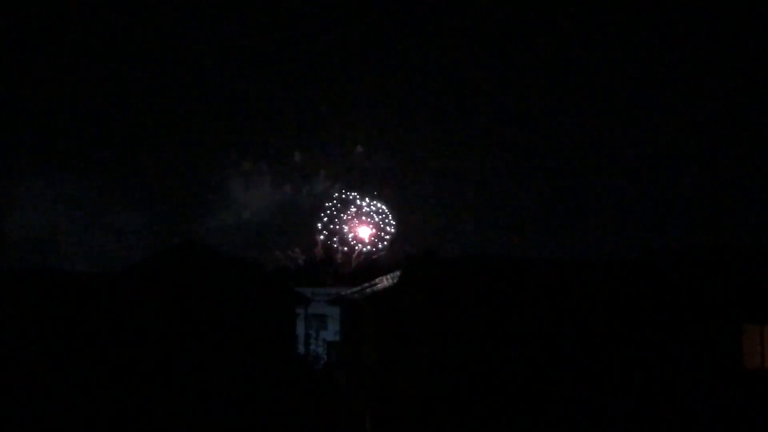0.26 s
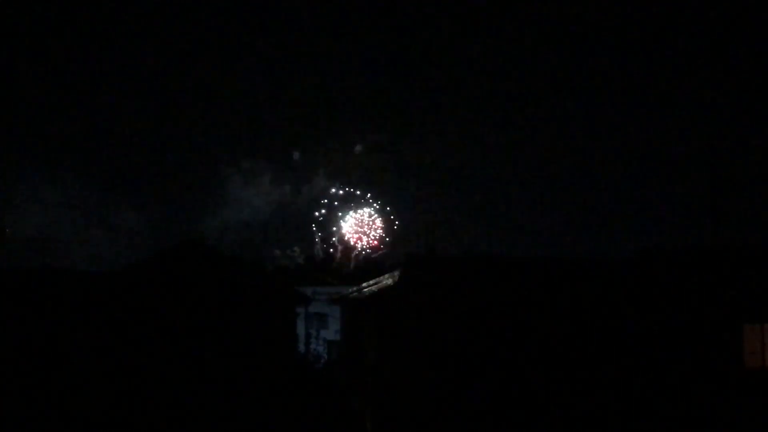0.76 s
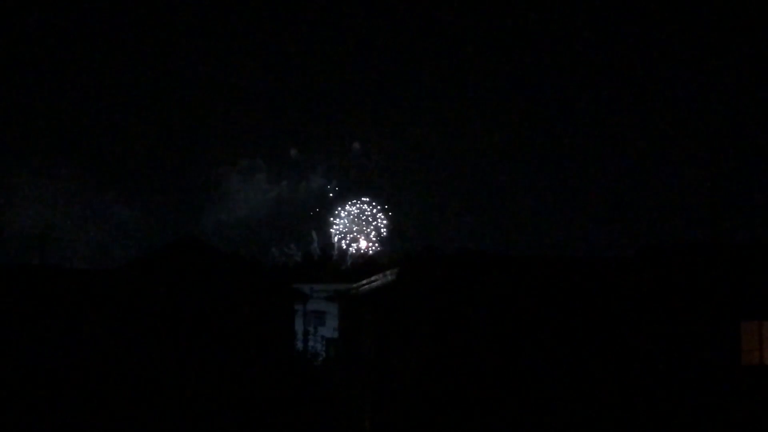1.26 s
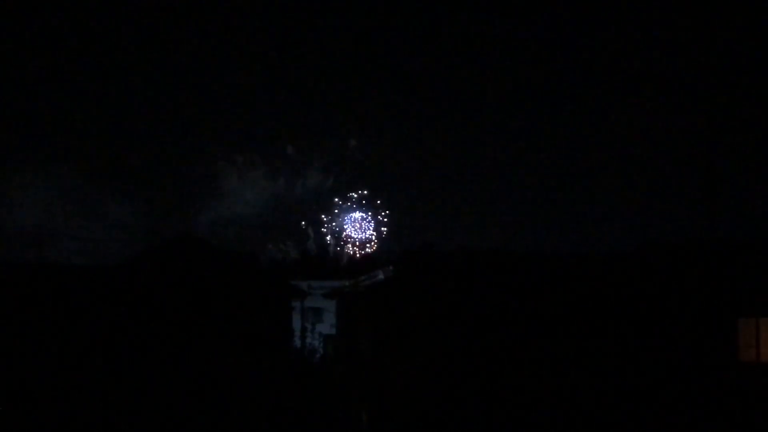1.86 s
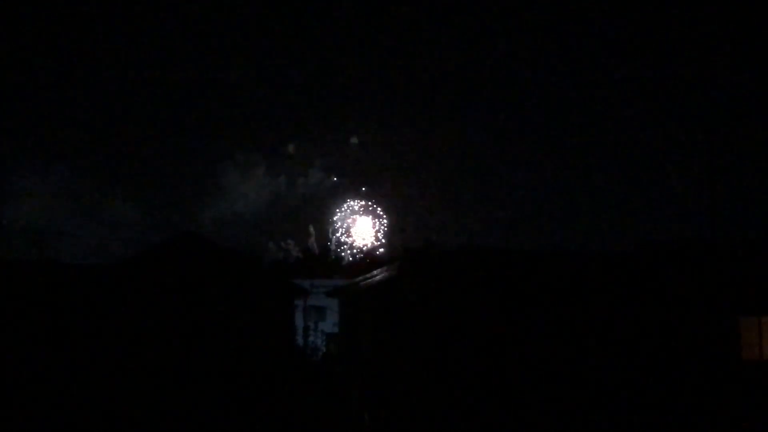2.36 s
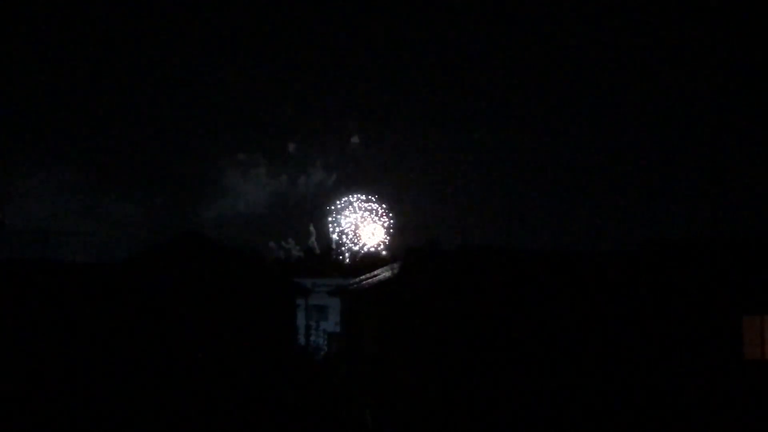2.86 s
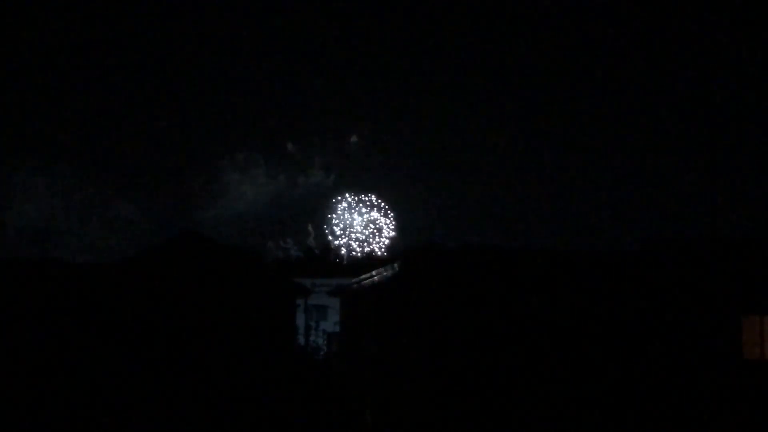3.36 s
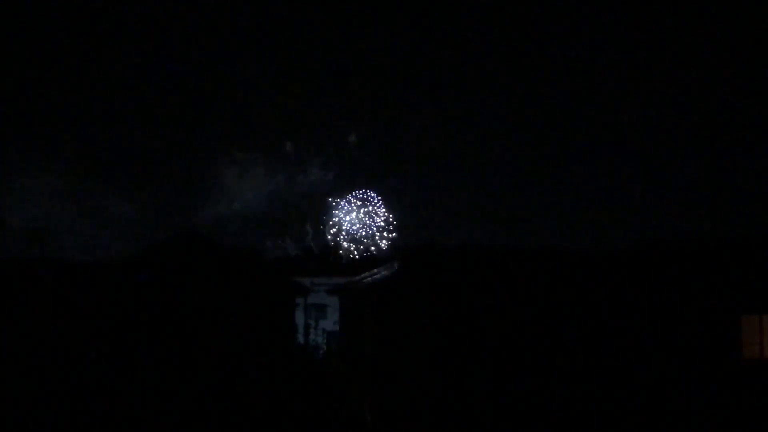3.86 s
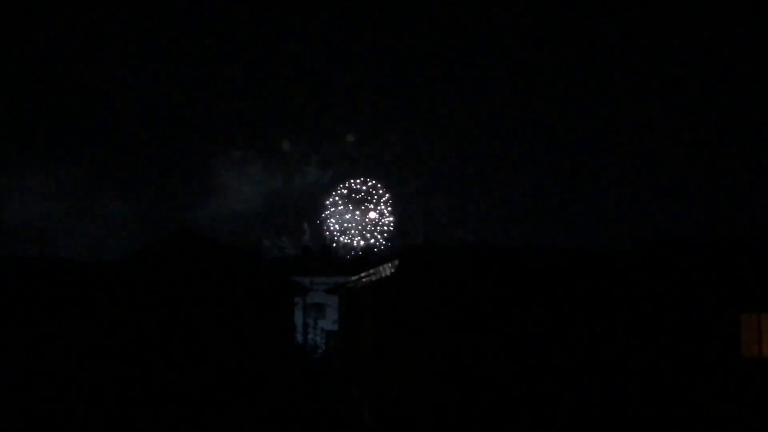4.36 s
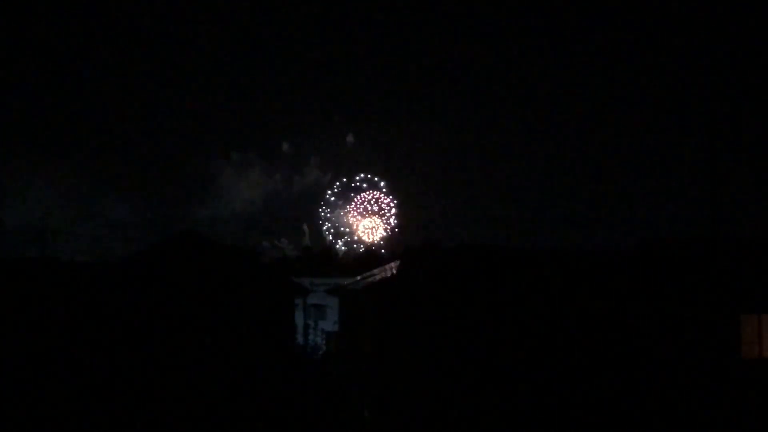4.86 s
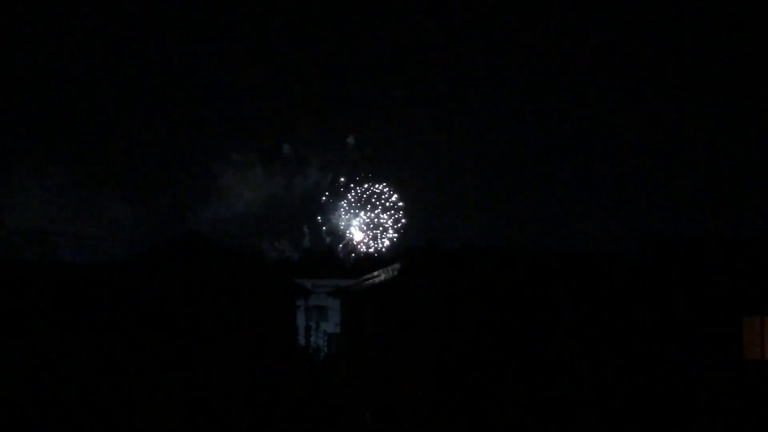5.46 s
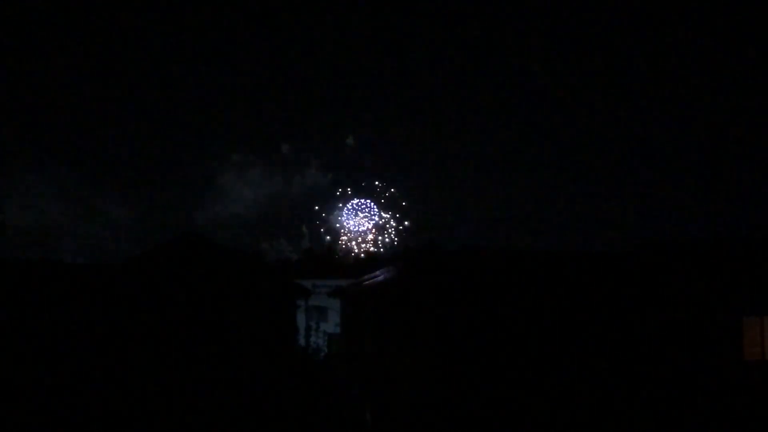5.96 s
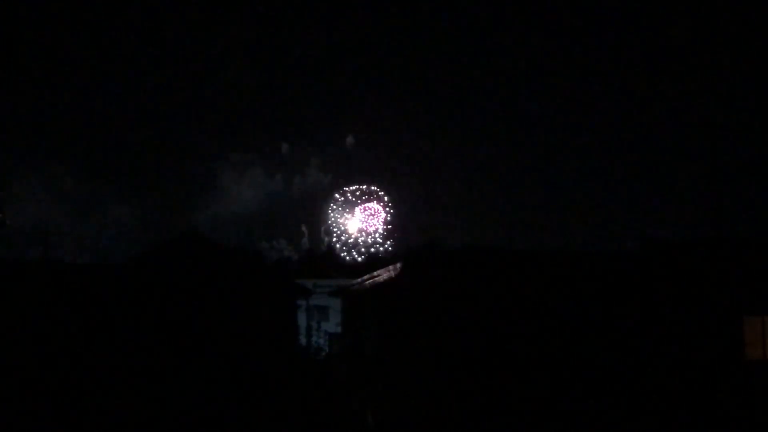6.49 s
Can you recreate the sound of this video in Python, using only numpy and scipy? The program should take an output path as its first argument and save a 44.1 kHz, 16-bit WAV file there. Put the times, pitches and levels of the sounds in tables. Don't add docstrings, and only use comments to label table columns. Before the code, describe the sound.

A summer night outdoors: the tail of one firework's echo opens, then double bangs arrive at regular intervals, sharp at the front and bassy underneath, rumbling back from trees and hills. Faint farther pops fall between. Nearby crickets keep up quick ticking chirps and soft trills over a distant insect chorus, and bush crickets buzz very high. The small microphone squashes the blasts slightly and adds faint hiss.

```python
import sys
import numpy as np
from scipy import signal
from scipy.fft import irfft
from scipy.io import wavfile
from scipy.ndimage import uniform_filter1d

SR = 44100
rng = np.random.default_rng(int(sys.argv[2]) if len(sys.argv) > 2 else 0)


def attenuation_scalar(level_db):
    decades = np.asarray(level_db, float) / 20
    return 10 ** decades


def dump(signal):
    limited = np.clip(np.atleast_2d(signal).T, -1, 1)
    pcm = np.round(limited * 32767).astype(np.int16)
    wavfile.write(sys.argv[1], SR, pcm)


N = 296793


def evened(x):
    return x / np.sqrt(np.mean(x ** 2) + 1e-20)


def read(points, hz):
    f, value = np.transpose(points)
    return np.interp(np.log(hz + 1), np.log(f + 1), value)


def add(mix, start_s, sound):
    at = round(start_s * SR)
    sound = sound[max(-at, 0):]
    part = mix[max(at, 0):][:len(sound)]
    part += sound[:len(part)]


def resonate(x, hz, width_hz):
    turn = np.exp(2j * np.pi * np.cumsum(hz * np.ones(len(x))) / SR)
    r = np.exp(-np.pi * width_hz / SR)
    smooth = signal.lfilter([(1 - r) ** 2], [1, -2 * r, r * r], x / turn)
    return 2 * (turn * smooth).real


def wander(count, smooth_s):
    size = max(round(smooth_s * SR), 2)
    noise = uniform_filter1d(rng.standard_normal(count), size)
    return evened(uniform_filter1d(noise, size))


def hiss(count, field_db, patchy_db):
    hz = np.fft.rfftfreq(1024, 1 / SR)[:, None]
    t = np.arange(count // 256 + 5) * 256 / SR
    a, b, patches = rng.standard_normal((len(t), 513, 3)).T
    patches = uniform_filter1d(patches, size=9, axis=0)
    patches = evened(uniform_filter1d(patches, size=7, axis=1))
    z = (a + 1j * b) * attenuation_scalar(field_db(hz, t) + patchy_db * patches)
    return signal.istft(z, nperseg=1024, noverlap=768)[1][:count]


# pitch_hz, level_db
NIGHT = [(20, -37), (30, -27), (80, -12), (220, 0), (340, -11.5), (480, -15.5), (760, -20), (1300, -25.5),
         (2500, -36), (5000, -44), (9000, -47), (16000, -63.5)]
# pitch_hz, width_hz, level_db
FAR_INSECTS = [(3720, 336, -68), (4013, 230, -69.5), (9680, 650, -94.5), (12500, 1500, -95),
               (15500, 300, -93.5)]


def night():
    linger_db, linger_s, linger_hz = 8, 0.8, 2500

    def field_db(hz, t):
        since = t[:, None] - np.array(SHELLS)[:, 0]
        since = np.where(since >= 0, since, np.inf).min(1)
        linger = np.clip(1 - since / linger_s, 0, 1) / (1 + (hz / linger_hz) ** 2)
        return read(NIGHT, hz) + linger_db * linger

    out = attenuation_scalar(-52) * evened(hiss(N, field_db, patchy_db=1.0))
    for hz, width_hz, db in FAR_INSECTS:
        chorus = evened(resonate(rng.standard_normal(N), hz, width_hz))
        out += attenuation_scalar(db + 1.4 * wander(N, 0.007)) * chorus
    return out


def rustle():
    t = np.arange(round(.2 * SR)) / SR
    brush = evened(resonate(rng.standard_normal(len(t)), 9000, 3500))
    level = attenuation_scalar(-80.0 + 3 * wander(len(t), .004)) * np.sin(np.pi * t / t[-1])
    out = np.zeros(N)
    add(out, .98, level * brush)
    return out


# start_s, stop_s, level_db
RASP = [
    (.15, 1.1, -79.5),
    (2.55, 3.67, -79.5),
]


def rasp():
    idle_db, rise_s, cut_s = -89.5, 0.32, .07
    idle_throb_db, full_throb_db, throbs_per_s = 2.5, 1.0, 14.5
    t = np.arange(N) / SR
    effort = [np.interp(t, [a, a + rise_s, b - cut_s, b], [0, 1, 1, 0]) for a, b, db in RASP]
    effort_db = sum((db - idle_db) * e for (a, b, db), e in zip(RASP, effort))
    depth_db = idle_throb_db + (full_throb_db - idle_throb_db) * sum(effort)
    throb_db = depth_db * np.sin(2 * np.pi * throbs_per_s * t + 1.6 * wander(N, .3))
    scrape = evened(resonate(rng.standard_normal(N), 7840, 630))
    return attenuation_scalar(idle_db + effort_db + throb_db) * scrape


# start_s, stop_s
TRILLS = [(-.22, .175), (.62, 1.07), (1.52, 1.935), (2.379, 2.82), (3.27, 3.685), (4.17, 4.575),
          (4.98, 5.39), (5.869, 6.285)]


def trills():
    out = np.zeros(N)
    for start, end in TRILLS:
        t = np.arange(0, end - start, 1 / SR)
        grown = t / t[-1]
        ticks_per_s = 163 - 16 * grown + 6 * wander(len(t), 0.0056)
        ticks = np.diff(np.floor(np.cumsum(ticks_per_s) / SR), prepend=0)
        drive = evened(ticks * rng.uniform(0.35, 1, len(t))) + 0.82 * rng.standard_normal(len(t))
        ring = evened(resonate(drive, 6500 + 240 * grown, 300))
        swell = attenuation_scalar(-83.5 + 6.5 * grown ** 0.52)
        add(out, start, swell * ring * signal.windows.tukey(len(t), .08))
    return out


# start_s, full_s, stop_s, level_db, wing_hz
FAR_BUZZ = [(t, t + 0.061, t + .33, -83, 12250) for t in (1.56, 2.58, 3.58, 4.53)]
# start_s, full_s, stop_s, level_db, wing_hz
NEAR_BUZZ = [
    (4.95, 5.72, 5.94, -63.5, 13200),
    (6.22, 6.745, 6.76, -62, 12650),
]
# time_s, strokes_per_s
FAR_STROKES = [(0, 353.7), (7, 353.7)]
# time_s, strokes_per_s
NEAR_STROKES = [(6.1, 348.26), (6.35, 349), (6.47, 351.8)]


def phrase(start, full, stop, db, wing_hz, swell_db_per_s):
    start_db, stop_db = -22, -18.5
    ragged_s, stop_s = .04, .1
    soft, smooth, torn = 0.29, .15, .6
    swell = max(full + start_db / swell_db_per_s, start + 1 / SR)
    ragged = max(stop - ragged_s, full + 1 / SR)
    return [(start, db + start_db, wing_hz, soft),
            (swell, db + start_db, wing_hz, soft),
            (full, db, wing_hz, smooth),
            (ragged, db, wing_hz, smooth),
            (stop, db, wing_hz, torn),
            (stop + stop_s, db + stop_db, wing_hz, soft)]


def buzz(rows, strokes, width_hz):
    s, *columns = np.transpose(rows)
    t = np.arange(s[0], s[-1], 1 / SR)
    db, wing_hz, rough = (np.interp(t, s, c) for c in columns)
    rate = np.interp(t, *np.transpose(strokes))
    turn = 2 * np.pi * np.cumsum(rate) / SR
    comb = np.zeros(len(t))
    for k in range(22, 46):
        resonance = 1 / (1 + ((k * rate - wing_hz) / width_hz) ** 2)
        line = np.cos(k * turn + 2 * np.pi * rng.random())
        comb += attenuation_scalar(4.5 * wander(len(t), 0.049)) * resonance * line
    scrape = resonate(rng.standard_normal(len(t)), wing_hz, 2.2 * width_hz)
    return attenuation_scalar(db) * (evened(comb) + np.clip(rough, 0, 1) * evened(scrape))


def bush_crickets():
    out = np.zeros(N)
    for row in FAR_BUZZ:
        add(out, row[0], buzz(phrase(*row, swell_db_per_s=280), FAR_STROKES, width_hz=830))
    for row in NEAR_BUZZ:
        add(out, row[0], buzz(phrase(*row, swell_db_per_s=43), NEAR_STROKES, width_hz=1600))
    return out


# time_s, beats_counted
BEATS = [(-.048, -1), (4.793, 26), (5.708, 31), (6.785, 37)]


def beat():
    beat_s, level_db = .18, -65
    since = beat_s * (np.interp(np.arange(N) / SR, *np.transpose(BEATS)) % 1)
    gate_s = [0, .004, .075, .095, .14, .16, beat_s]
    gate_db = np.interp(since, gate_s, [-24, -4, -2.5, -10.5, -16.5, -19.0, -21])
    wing_hz = 5290 - 500 * since
    steady = np.sin(2 * np.pi * np.cumsum(wing_hz + 130 * wander(N, .003)) / SR)
    strokes = .3 + abs(np.sin(np.pi * 110 * since))
    drive = strokes * (.65 * steady + 2 * rng.standard_normal(N))
    ring = evened(resonate(drive, wing_hz, width_hz=355))
    return attenuation_scalar(level_db + gate_db + 0.82 * wander(N, .03)) * ring


# first_s, last_s, level_db
SLOW_CHIRPS = [(.366, .728, -58), (1.53, 1.858, -58), (2.431, 2.627, -58), (3.194, 3.504, -58.5),
               (4.351, 4.837, -58.5), (6.059, 6.499, -58)]
# first_s, last_s, level_db
QUICK_CHIRPS = [(.13, .17, -67.5), (.798, 1.056, -61.5), (1.096, 1.481, -61.5), (1.93, 2.387, -62),
                (2.706, 2.778, -58.5), (2.835, 3.111, -61), (3.589, 3.709, -63), (4.011, 4.143, -67.5),
                (4.19, 4.273, -67), (4.874, 5.027, -61.5), (5.087, 5.13, -60), (5.196, 5.355, -61.5),
                (5.43, 5.645, -76), (5.762, 5.994, -72), (6.559, 6.718, -60.5)]


def chirp_times():
    warm_up_db, uneven_db, uneven_s = -2, 1.84, .0015
    rows = []
    # phrases, gap s, chirp length s
    for phrases, gap, length in ((SLOW_CHIRPS, .063, .039), (QUICK_CHIRPS, .039, .033)):
        for first, last, db in phrases:
            s = np.linspace(first, last, round((last - first) / gap) + 1)
            rows += list(zip(s, db + warm_up_db * (s == first), length + 0 * s))
    return np.array(rows) + rng.standard_normal((len(rows), 3)) * [uneven_s, uneven_db, uneven_s]


def chirps():
    out, rows = np.zeros(N), chirp_times()
    for (s, db, length), (detune, lag) in zip(rows, rng.standard_normal((len(rows), 2))):
        t = np.arange(0, length, 1 / SR)
        hz = 4460 * (1 + .011 * detune) - 760 * t / length
        turn = 2 * np.pi * np.cumsum(hz) / SR
        strokes = abs(np.sin(np.pi * 84 * t + .15 + 0.43 * lag)) ** 0.58
        swell = np.sin(np.pi * (t / length) ** 1.51) ** 0.99
        tone = np.sin(turn) + 0.028 * np.sin(2 * turn) + .03 * np.sin(3 * turn)
        add(out, s - .6 * length, attenuation_scalar(db + 4.5) * strokes * swell * tone)
    smear = rng.standard_normal(1500) * attenuation_scalar(-60 * np.arange(1500) / SR / 0.05)
    return out + 0.51 * signal.oaconvolve(out, smear / np.linalg.norm(smear))[:N]


# pitch_hz, level_db
BOOM = [(30, -66), (60, -10), (90, -1.5), (120, 0), (160, 6.5), (200, 4.5), (250, 8), (300, -2.5),
        (380, -23), (600, -76.5)]
# pitch_hz, level_db
CRACK = [(300, -43.5), (400, -18.5), (520, -15.5), (650, -16), (850, -21), (1250, -18.5), (1700, -32.5),
         (3000, -37), (5000, -51.5), (7000, -63.5), (10000, -89)]
# pitch_hz, delay_ms
DRAG = [(60, 12), (90, 12.3), (120, 10.6), (160, 8.8), (200, 7.9), (250, 6.9), (300, 5.6), (450, 3.3),
        (650, 2.3), (1000, .85), (4000, .35)]
# delay_ms, signed_share
WALLS = [(5.5, 0.12), (9, -0.073), (13.2, -0.099), (17.5, 0.097), (24.3, 0.065), (31, -0.043), (40, 0.011),
         (62, 0.052)]


def bang(boom_db, crack_db, bright_db, size):
    hz = np.fft.rfftfreq(8192, 1 / SR)
    delay_s = read(DRAG, hz / size) * size ** -1 / 1000
    phase = 2 * np.pi * np.cumsum(delay_s) * hz[1] - .1
    late = rng.uniform(0.0004, .014, 30)
    share = rng.normal(0, 0.42, 30) * attenuation_scalar(-60 * late / 0.024)
    scatter = (share * np.exp(-2j * np.pi * hz[:, None] * late)).sum(1)
    split = 1 + scatter * np.clip(hz / 2600, 0, 1)
    crack = attenuation_scalar(crack_db + read(CRACK, hz) + bright_db * np.log2(1 + hz / 1200)) * split
    crack = crack * (1 + 0.5 * np.exp(-2j * np.pi * hz * 0.001765 / size))
    boom = attenuation_scalar(boom_db + read(BOOM, hz / size))
    dull = 1 / (1 + (hz / 700) ** 2)
    walls = 1 + dull * sum(part * np.exp(-2j * np.pi * hz * ms / 1000) for ms, part in WALLS)
    wave = irfft((boom + crack) * walls * np.exp(-1j * phase)) * 120
    onset = np.sin(np.pi / 2 * np.minimum(np.arange(6000) / 24, 1)) ** 2
    return wave[:6000] * onset


# pitch_hz, level_db (per Hz)
ROLL = [(30, -39.5), (60, -6), (100, -5), (185, -1), (250, 0.5), (345, -16), (510, -15), (750, -19),
        (1300, -23.5), (2000, -31), (3200, -39), (5000, -55), (8000, -89)]
# pitch_hz, t60_s
ROLL_T60 = [(60, 1.15), (200, 1.13), (500, 1.56), (1200, 1.04), (3000, 1.02)]


def roll(level_db, seconds, treble_db=0.):
    near_s, near_bass_db, near_treble_db = 0.0096, 10, 5.5
    bass_fade_db_per_s, treble_fade_db_per_s = 7, 9
    hill_s, hill_spread_s, hill_db = .38, 0.12, 8
    count = round(seconds * SR)
    slaps = rng.standard_normal(count) * (1 + 3 * (rng.random(count) < 400 / SR))
    clumps = evened(slaps * attenuation_scalar(1.8 * wander(count, 0.012)))
    hz, t, z = signal.stft(clumps, SR, nperseg=512)
    near = t / near_s * np.exp(1 - t / near_s)
    hill = np.exp(-((t - hill_s) / hill_spread_s) ** 2)
    bass_db = 2.5 + near_bass_db * near - bass_fade_db_per_s * t
    high_db = near_treble_db * near - treble_fade_db_per_s * t + hill_db * hill
    high = (hz ** 2 / (hz ** 2 + 450 ** 2))[:, None]
    land_db = (1 - high) * bass_db + high * (high_db + treble_db)
    lumps = uniform_filter1d(rng.standard_normal(z.shape), size=8, axis=0)
    lumps = evened(uniform_filter1d(lumps, size=3, axis=1))
    decay_db = -60 * t / read(ROLL_T60, hz)[:, None]
    z = z * attenuation_scalar(level_db + 20.5 + land_db + 1.78 * lumps + read(ROLL, hz)[:, None] + decay_db)
    fade_in = np.minimum(np.arange(count) / SR / 0.0066, 1)
    return signal.istft(z, SR, nperseg=512)[1][:count] * fade_in


# start_s, boom_db, crack_db, bright_db (per octave above the crack), size (factor on pitch)
SHELLS = [(-.35, -11.5, -15, 0, 1), (1.099, -13.5, -10.5, 0.5, 0.97), (1.166, -14.5, -15.5, 0.5, 1.04),
          (2.06, -12.5, -15.5, 1, 0.95), (2.164, -17.5, -15.5, -2, 1.024),
          (3.1465, -17.5, -14, -3.5, 1.036), (3.24, -12.5, -14.5, -1, 0.97),
          (4.2916, -14.5, -13.5, -2.5, 0.98), (4.4174, -15, -19, 1, 1.01), (5.3892, -13, -11, 1.5, 0.99),
          (5.462, -13.5, -11, -2, 0.995), (6.4688, -17, -14.5, 3.5, 1.08)]
# start_s, level_db
POPS = [(0.372, -45.5), (0.773, -58), (1.509, -46), (2.73, -56), (3.303, -55), (3.92, -74), (5.367, -46.5),
        (6.611, -43.5)]


def fireworks():
    out = np.zeros(N)
    for s, boom_db, crack_db, bright_db, size in SHELLS:
        add(out, s, bang(boom_db, crack_db, bright_db, size))
        add(out, s, roll(boom_db - 23.5, 0.99, treble_db=0.47 * (crack_db - boom_db)))
    fade = attenuation_scalar(-60 * np.arange(round(.1 * SR)) / SR / 0.39)
    for s, db in POPS:
        add(out, s, .4 * bang(db, db + 4, -4., 1.1))
        add(out, s, roll(db - 10.5, .1, treble_db=10.0) * fade)
    air = signal.butter(4, [50, 6500], "band", fs=SR, output="sos")
    return signal.sosfiltfilt(air, out)


def scene():
    insects = rasp() + trills() + bush_crickets() + beat() + chirps()
    return (night() + rustle() + insects + fireworks())[None]


def band_limit(x):
    return signal.sosfilt(signal.butter(12, 16110, fs=SR, output="sos"), x)


def record(dry):
    ceiling, mic_hiss_db = .36, -80
    power = uniform_filter1d(dry[0] ** 2, size=400, origin=199)
    power_db = 10 * np.log10(abs(power) + 1e-12)
    fall = np.arange(N) * 340.0 / SR
    held_db = np.maximum.accumulate(power_db + fall) - fall
    over_db = np.maximum(held_db + 9, 0)
    ducked = dry / attenuation_scalar(0.047 * uniform_filter1d(over_db, size=300, origin=149))
    rounded = ceiling * np.tanh(ducked / ceiling)
    heard = rounded + attenuation_scalar(mic_hiss_db) * rng.standard_normal(N)
    heard = signal.sosfilt(signal.butter(2, 38, "high", fs=SR, output="sos"), heard)
    treble_edge = signal.firwin(1023, 15765, window=("kaiser", 10), fs=SR)
    mix = signal.oaconvolve(heard, treble_edge[None], "same")
    return band_limit(mix)


dry = scene()
out = record(dry)
dump(out)
```